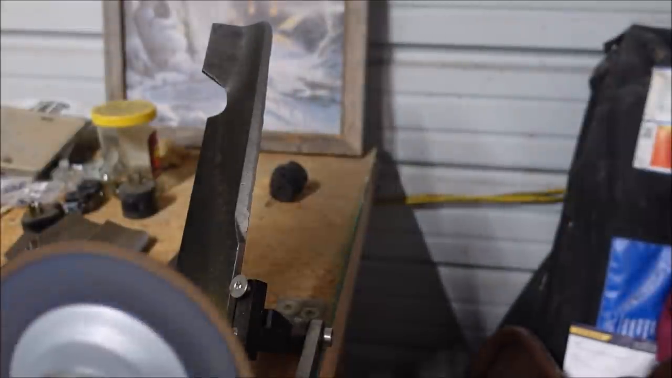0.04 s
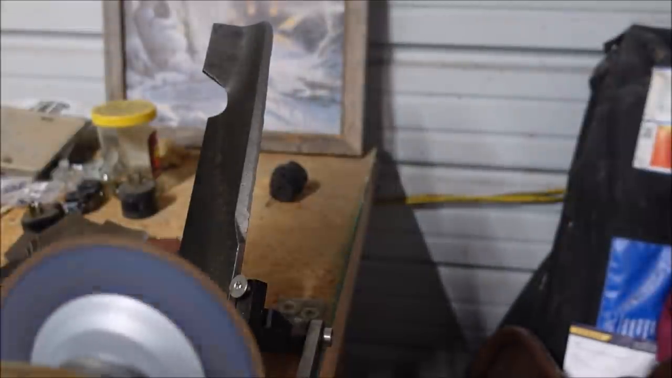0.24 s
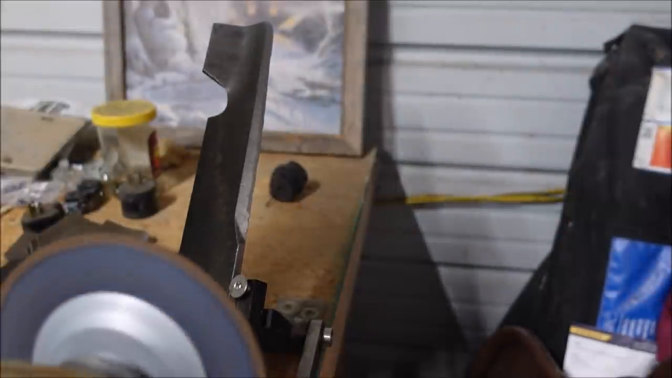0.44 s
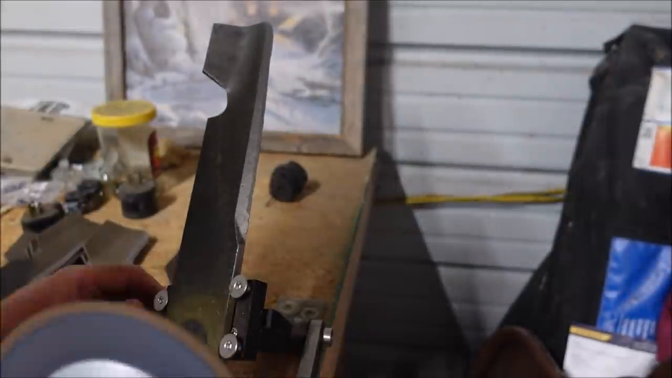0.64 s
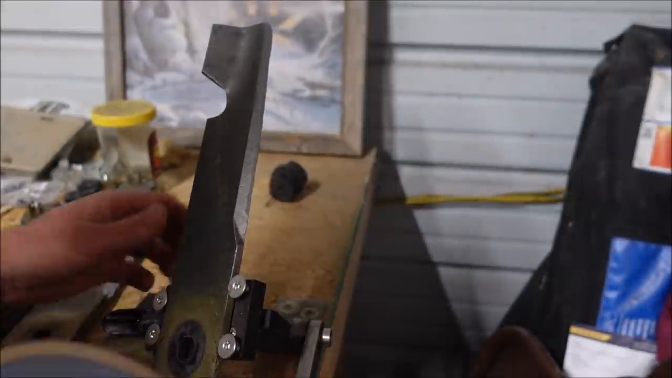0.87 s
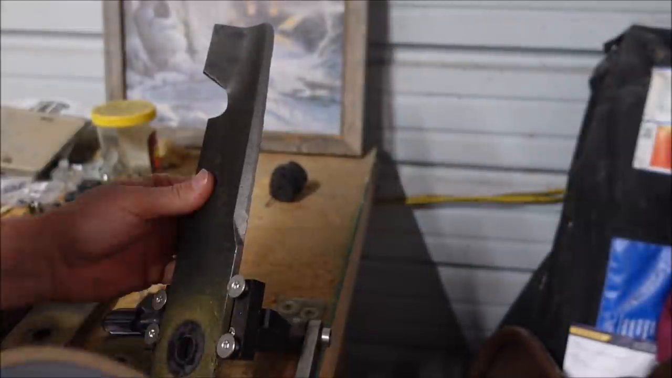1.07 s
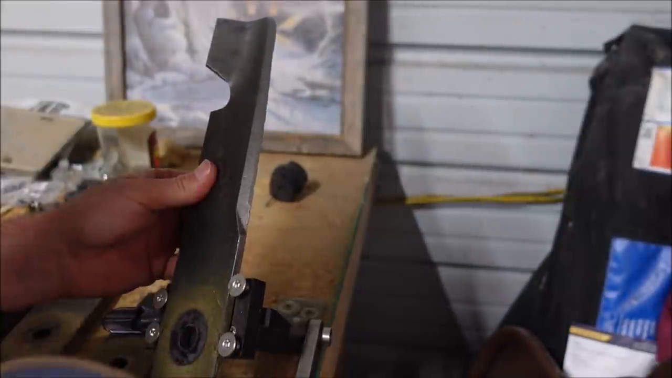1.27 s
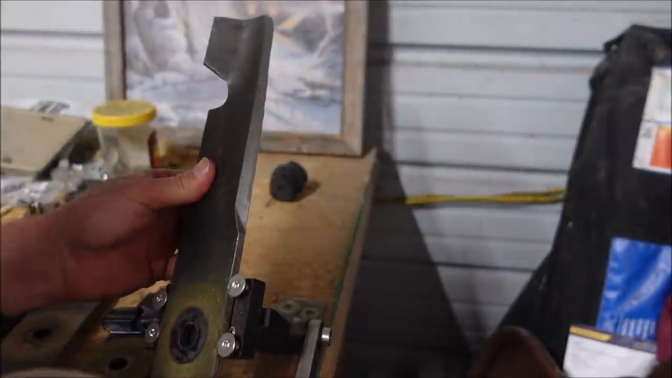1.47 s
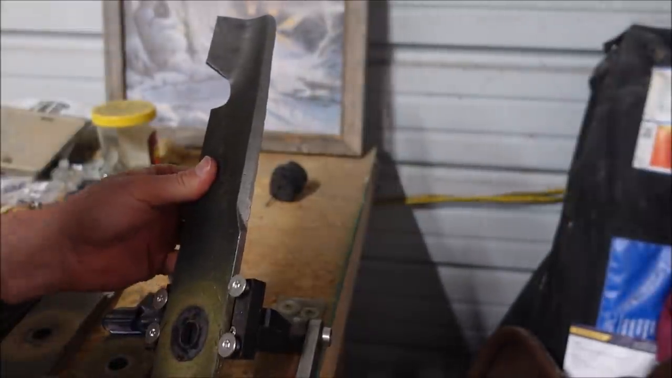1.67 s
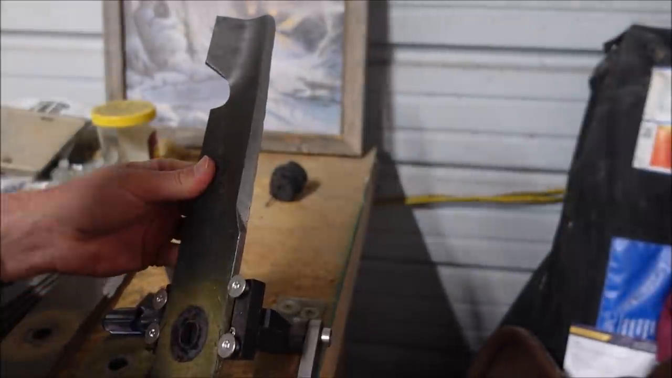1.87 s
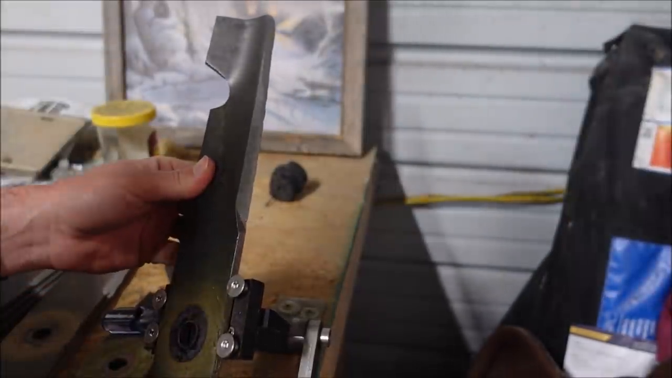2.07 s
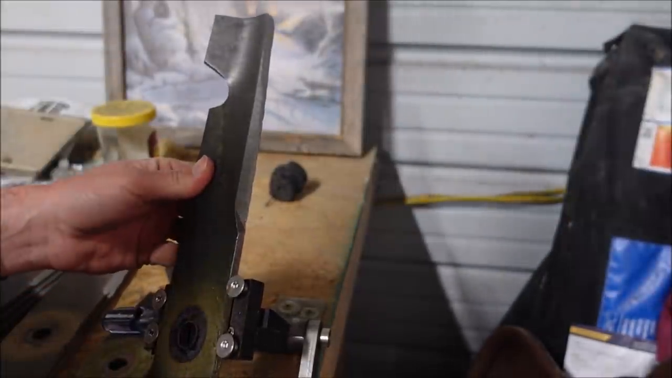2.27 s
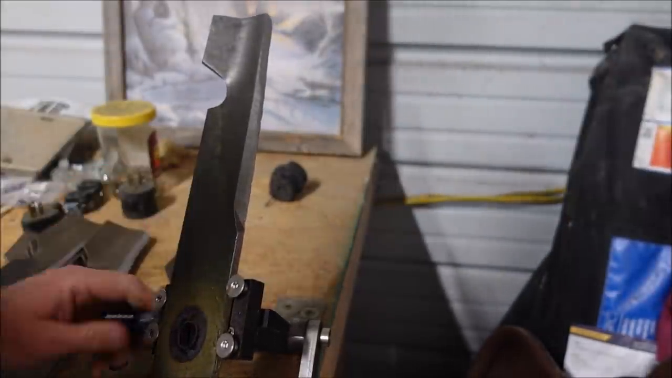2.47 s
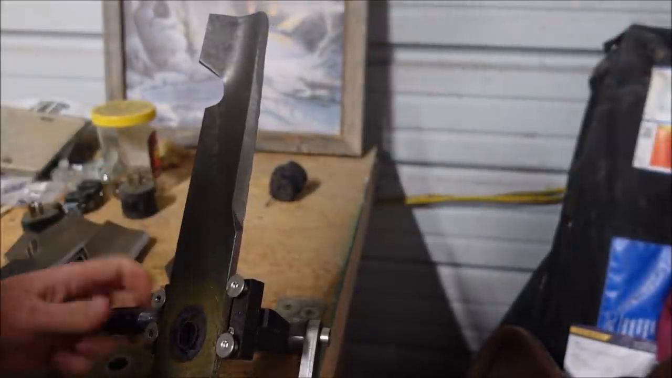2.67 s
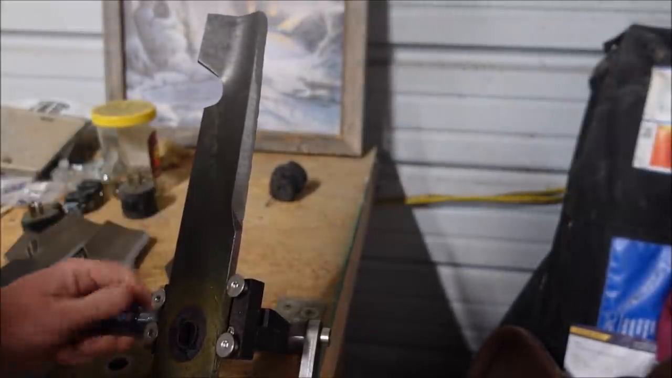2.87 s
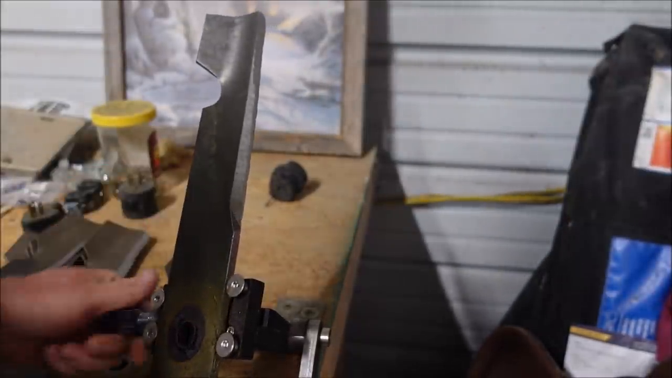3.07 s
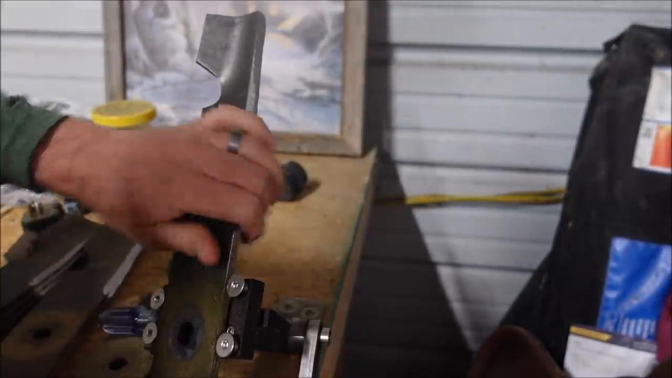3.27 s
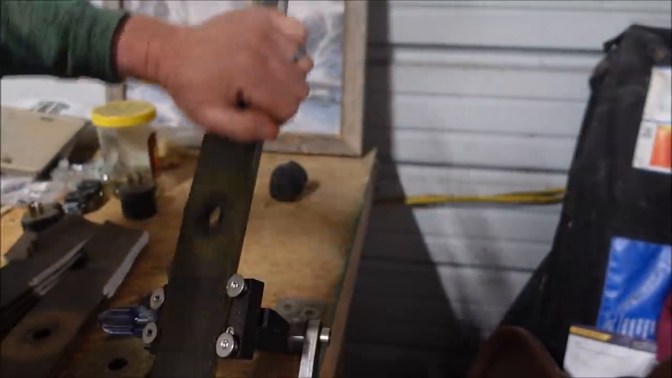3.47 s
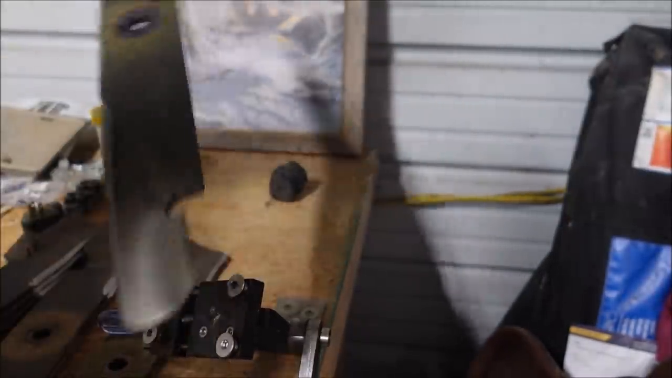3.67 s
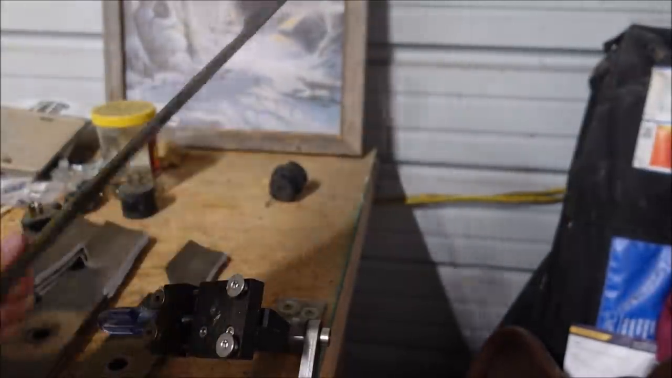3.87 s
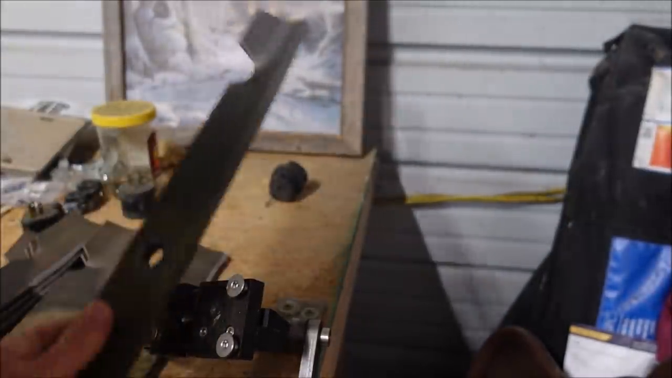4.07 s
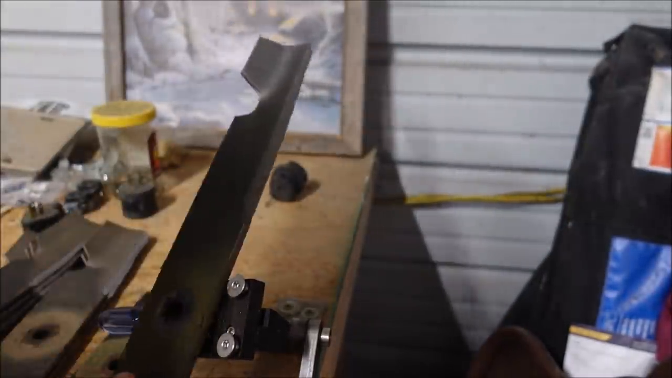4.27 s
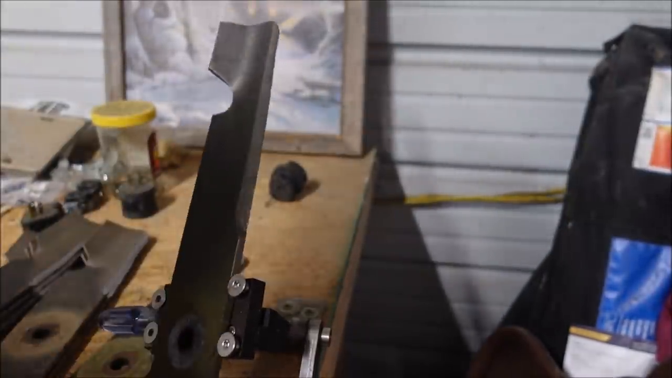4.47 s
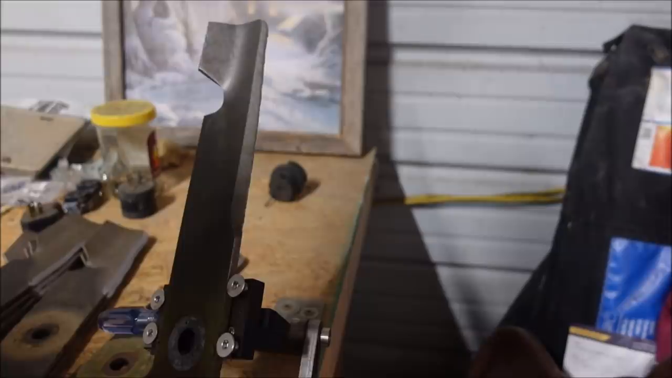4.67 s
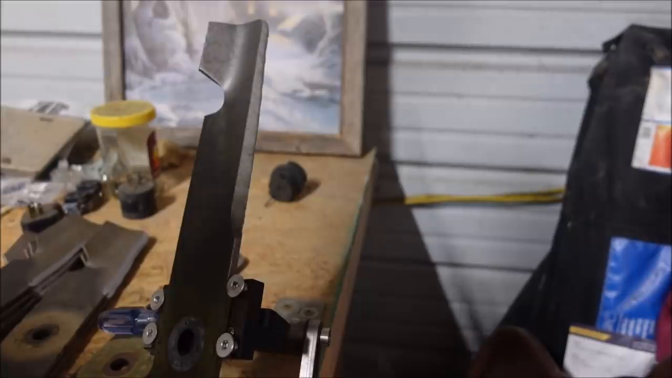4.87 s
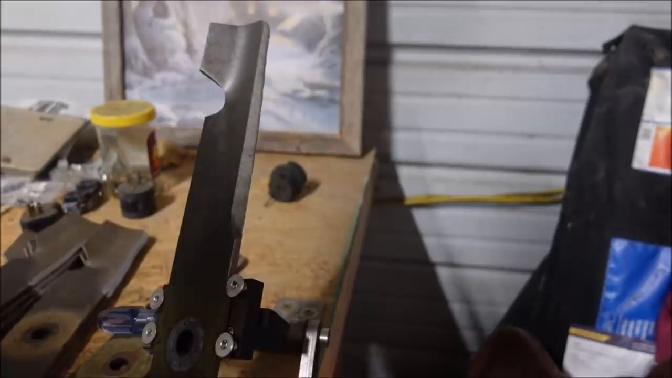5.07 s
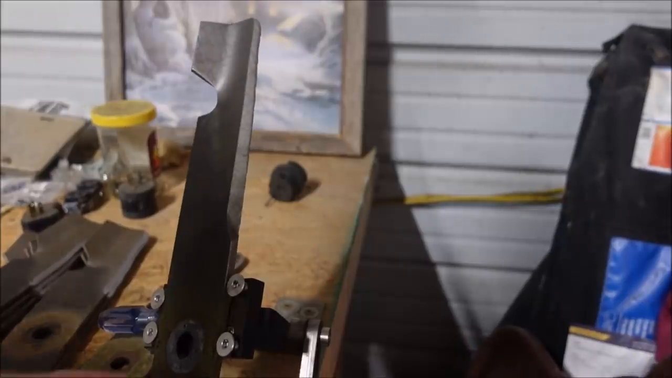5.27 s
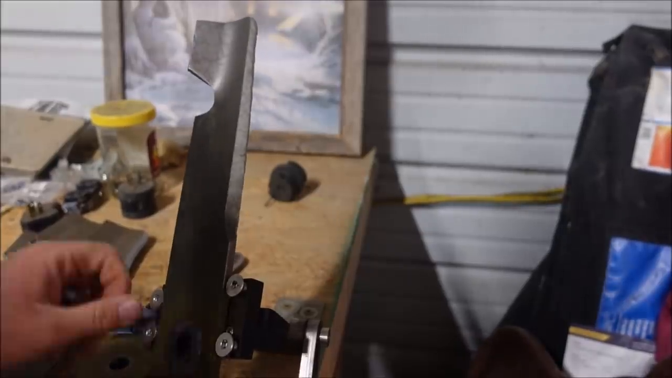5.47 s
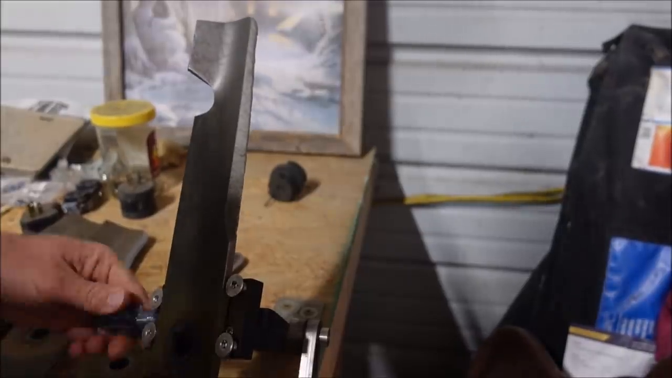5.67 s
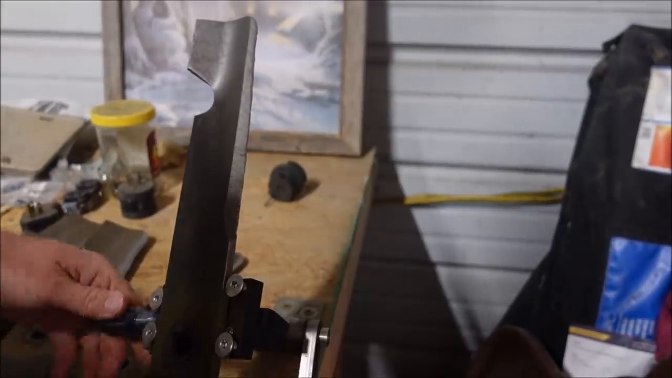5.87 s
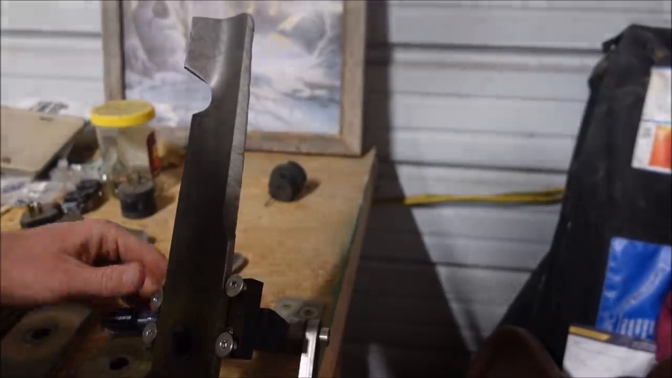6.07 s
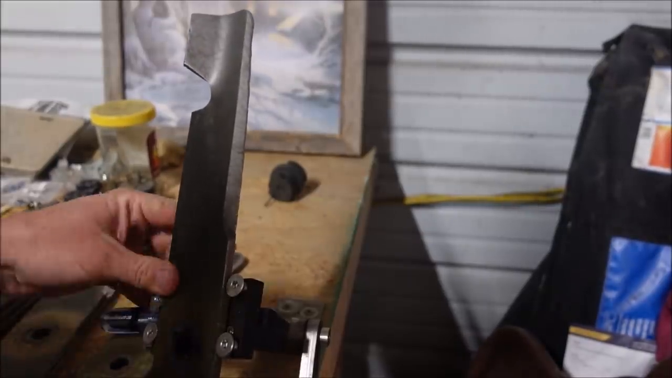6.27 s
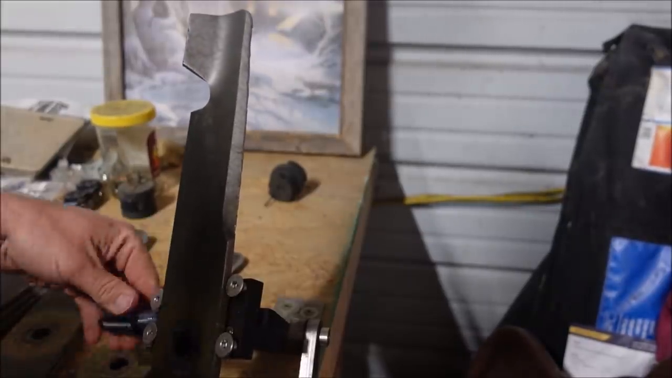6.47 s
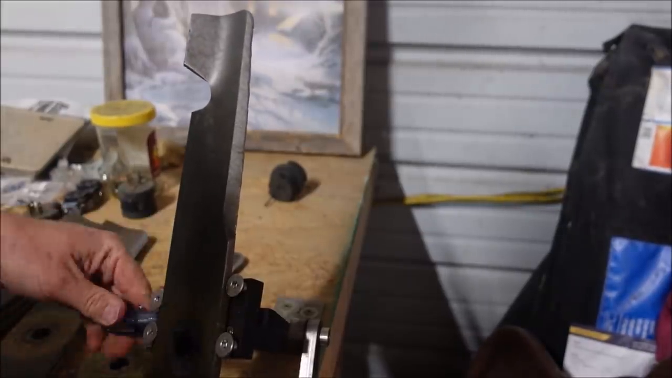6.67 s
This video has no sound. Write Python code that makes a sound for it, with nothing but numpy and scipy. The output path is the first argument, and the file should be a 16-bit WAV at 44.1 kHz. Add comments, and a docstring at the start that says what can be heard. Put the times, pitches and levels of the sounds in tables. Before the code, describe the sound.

In a small sheet-metal workshop with a short, bright echo, a switched-off angle grinder is coasting down close to the microphone, slightly left. Its rough, hissing gear noise and faint falling whine beat with each turn. From 0.8 to 1.4 s loose gears rattle ever faster; at 1.5 s it is laid down and sounds thinner, grinding slower and gone by 2.45 s. Light clamp ticks come from 2.6 to 3.1 s. At about 3.4 s sharp metallic clicks and short scrapes free a steel blade, with the strongest bright clank near 3.6 s. A near-quiet gap holds faint pings around 4.0 s. Clanks and duller jig knocks at 4.25 and 4.4-4.55 s seat the blade. Afterwards only small ticks, faint rubs and tiny pings continue until 6.7 s over soft room noise, with slightly clearer ticks near 4.95 and 6.06 s.

```python
"""A switched-off angle grinder coasts down in a sheet-metal workshop: gear noise beating with each turn.
From about 0.8 to 1.4 s its loose gears rattle ever faster; laid down at 1.5 s it sounds thinner, gone by 2.45 s.
From 2.3 s a hand frees a steel mower blade from its clamp, slides it out, turns it and, at 4.6 s, has it seated:
noise bursts make ticks, jig knocks and scrapes and excite the blade's modes; soft tones make faint pings.
The workshop echoes throughout, over the soft noise of a quiet room."""
import sys
import numpy as np
from scipy import signal
from scipy.fft import rfft, irfft, next_fast_len
from scipy.io import wavfile
from scipy.ndimage import uniform_filter1d, map_coordinates

SR = 44100
rng = np.random.default_rng(int(sys.argv[2]) if len(sys.argv) > 2 else 0)


def rack_gain(trim_db):
    """Turn a fader trim in dB into the linear factor to multiply a signal by."""
    fader = np.asarray(trim_db, float)
    return 10 ** (fader / 20)


def to_wav(s):
    """Save 16-bit WAV."""
    ch = np.atleast_2d(s).T  # columns
    pcm = np.round(np.clip(ch, -1, 1) * 32767)  # PCM
    wavfile.write(sys.argv[1], SR, pcm.astype(np.int16))


N = 296352
T = np.arange(N) / SR


def unit(x):
    """Scaled to rms 1."""
    return x / np.sqrt(np.mean(x ** 2) + 1e-20)


def along(points, hz):
    """Reads a value between (Hz, value) points, on a log frequency axis."""
    f, v = np.transpose(points)
    return np.interp(np.log(hz + 1), np.log(f + 1), v)


def curves(rows):
    """One value per sample for each column after the time."""
    s, *cols = np.transpose(rows)
    return [np.interp(T, s, c) for c in cols]


def filtered(x, response):
    """x filtered by a complex response of frequency."""
    m = next_fast_len(N + SR)
    return irfft(rfft(x, m) * response(np.fft.rfftfreq(m, 1 / SR)), m)[..., :N]


def hiss(spectrum):
    """Fresh noise of rms 1 with this colour."""
    return unit(filtered(rng.standard_normal(N), lambda hz: rack_gain(along(spectrum, hz))))


def resonances(peaks):
    """Causal response of (centre Hz, width Hz, dB) peaks, added together."""
    return lambda f: sum(rack_gain(db) * 1j * f * w / (c * c - f * f + 1j * f * w) for c, w, db in peaks)


def wobble(rate):
    """A smooth random curve through rate random values a second."""
    return map_coordinates(rng.standard_normal(int(N * rate / SR) + 4), [T * rate])


# How the grinder's parts swell and die, before mixing:
# (time [s], gear noise level [dB], housing drone level [dB], strike level [dB])
GRINDER_LEVELS = [(0.02, -18.5, -46, -25), (.7, -21.5, -36.5, -20), (.95, -25, -41, -22.5),
                  (1.2, -30, -40.5, -20.5), (1.5, -24.5, -42, -17), (1.75, -20.5, -41.5, -22.5),
                  (1.95, -23.5, -38.5, -24.5), (2.08, -29.5, -42, -27.5), (2.18, -36, -47.5, -29),
                  (2.25, -45, -47, -34.5), (2.4, -87, -80, -70.5)]


def grinder():
    """The slowing rotor drives gear noise, a housing drone and tones tied to its turning."""
    # air drag slows the rotor exponentially and bearing friction adds a steady pull
    first_speed, friction = 218.476, 60.976  # turns per s
    coast_s = 1.7451
    speed = np.clip((first_speed + friction) * np.exp(-T / coast_s) - friction, 1, None)
    high_spot = .066  # where in each turn the gear's high spot strikes (turns)
    turns = np.cumsum(speed) / SR - high_spot
    gear_db, drone_db, strike_db = curves(GRINDER_LEVELS)
    laid = .7 * np.clip((T - 1.5) / .08, 0, 1)  # share taken away once the tool is laid down
    gears = gear_case(gear_blows(speed, turns, gear_db, strike_db), laid)
    fade = np.clip((2.45 - T) / .03, 0, 1)
    return fade * (gears + housing_drone(drone_db, laid) + rotor_tones(speed, turns))


def late_share():
    """Share of the late sound in the gears: none at first, all after 1.5 s."""
    return np.clip(T / 1.5, 0, 1)


def mesh_bounce():
    """Loose gears bounce apart and together ever faster, then settle; gives a level swing in dB."""
    first_s, settle_s = .758, 1.37
    rate, growth = 15.94, 43  # bounces per s at the first one, and per s per s
    since = T - first_s
    loose = np.clip(np.minimum(since + .03, settle_s - T) / .03, 0, 1)
    deepening = np.clip(0.57 + since / .7, 0, 1)
    bounces = rate * since + growth * since ** 2 / 2
    return 4 * loose * deepening * np.cos(2 * np.pi * bounces)


# Colour of the gear noise while fast and while slow: (frequency [Hz], relative level per Hz [dB])
FAST_GEARS = [(710, -35.5), (1200, -18.5), (2820, -1.5), (4310, -0.5), (7870, 0), (9170, -2), (15200, -7),
              (16400, -40)]
SLOW_GEARS = [(710, -65), (1200, -19), (2610, -4.5), (3180, -4.5), (7870, -2), (9790, -3), (15200, -14),
              (16400, -45.5)]


def gear_blows(speed, turns, gear_db, strike_db):
    """Meshing teeth make noise that beats with the rotor, with one burst each turn at the high spot."""
    turn, nearest = 2 * np.pi * turns, np.round(turns)
    # unbalance and tooth errors load the mesh once, three and four times a turn, less as it slows
    load_db = 3.5 * np.cos(turn) + 1.2 * np.cos(3 * turn) + .9 * np.cos(4 * turn)
    beat_db = load_db * speed / speed[0]
    bounce_db = mesh_bounce()
    unsteady_db = 1.4 * wobble(90) + 1.5 * wobble(600)
    steady = rack_gain(gear_db + .7 * bounce_db + beat_db + unsteady_db)
    scatter_db = 1.5 * rng.standard_normal(1000)[nearest.astype(int)]  # one draw for each turn's strike
    from_strike_s = (turns - nearest) / speed
    burst_shape = np.exp(-(from_strike_s / 0.0051) ** 2)
    bursts = rack_gain(strike_db + 1.255 * bounce_db + scatter_db) * burst_shape
    grit = unit(rack_gain(3.0 * wobble(900)))  # tooth clacks make each burst grainy
    late = late_share()
    teeth = np.sqrt(1 - late) * hiss(FAST_GEARS) + np.sqrt(late) * hiss(SLOW_GEARS)
    return np.sqrt(steady ** 2 + (bursts * grit) ** 2) * teeth


# Resonances of the gear case, which shift as the tool slows and is laid down:
# (frequency at first [Hz], frequency at last [Hz], width [Hz], relative level [dB])
CASE_PEAKS = [(1450, 1320, 130, 4), (1900, 1700, 130, 1), (2800, 2630, 280, -1), (4400, 4750, 550, 0),
              (6400, 6450, 300, -2), (9350, 9800, 600, 3.5)]


def gear_case(blows, laid):
    """The blows are heard directly and through the case's resonances; laid down, the direct part thins."""
    late = late_share()
    low_part = filtered(blows, lambda hz: 1 / (1 + (hz / 2300) ** 6))
    total = blows - laid * low_part
    for first_hz, last_hz, width, db in CASE_PEAKS:
        early_ring = filtered(blows, resonances([(first_hz, width, db)]))
        late_ring = filtered(blows, resonances([(last_hz, width, db)]))
        total = total + rack_gain(1.8 * wobble(6)) * ((1 - late) * early_ring + late * late_ring)
    return .7 * total


# Colour of the housing's drone: (frequency [Hz], relative level per Hz [dB])
DRONE_COLOUR = [(120, -74.5), (200, -31), (412, -22.5), (609, -2), (1080, 2), (1170, -4.5), (2200, 4.5),
                (2860, -29.5), (4840, -120)]


def housing_drone(drone_db, laid):
    """The housing hums as unsteady coloured noise; once laid down, the bench damps its upper part."""
    drone = rack_gain(drone_db + 3.6 * wobble(29.53)) * hiss(DRONE_COLOUR)
    return drone - laid * filtered(drone, lambda hz: 1 / (1 + (800 / (hz + 1)) ** 8))


# Tones tied to the rotor, before radiation and slowing weaken them:
# (cycles per turn [number], level [dB])
ROTOR_ORDERS = [(2.5, -50), (3, -46), (4, -46.5), (5, -48), (6, -52), (7, -51), (8, -49), (9, -50),
                (11, -51), (13, -51)]


def rotor_tones(speed, turns):
    """Sine tones glide down with the rotor; the small housing radiates low tones poorly."""
    total = np.zeros(N)
    for order, db in ROTOR_ORDERS:
        radiated = 1 / (1 + (520 / (order * speed)) ** 7)
        level = rack_gain(db + 4 * wobble(9) + 2.5 * wobble(45)) * radiated
        total += level * np.sin(order * 2 * np.pi * turns + rng.uniform(0, 2 * np.pi))
    return total * (speed / speed[0]) ** .6


# Colour of a tick: (frequency [Hz], relative level per Hz [dB])
TICK_COLOUR = [(710, -28), (1200, -10.5), (2260, -8), (6190, -2.5), (13000, -11.5), (14500, -15),
               (16400, -31)]


def handling():
    """Contacts and sliding sound as bright ticks, dull clacks, jig knocks and the ringing blade."""
    tick, clack, knock, ring, deep = taps() + slides()
    hard = hiss(TICK_COLOUR)
    dull = filtered(hard, lambda hz: 1 / (1 + (hz / 4000) ** 8))
    contact = tick * unit(hard - dull) + clack * unit(dull)
    return contact + knock * jig_knock() + rack_gain(16.0) * blade_ring(ring, deep)


# Contacts of clamp and blade, before mixing:
# (time [s], tick level [dB], knock re the tick [dB], blade ring re the tick [dB])
CONTACTS = [(2.33, -49.5, 10.5, -6), (2.6391, -21.5, -23, -6.5), (2.6655, -36.5, -13.5, -25),
            (2.7918, -29.5, -22, -13), (2.8437, -25.5, -22.5, -16), (2.8834, -32.5, -19, -5.5),
            (2.942, -43, -8.5, -3.5), (2.9892, -22.5, -24.5, -16), (3.0142, -36, -7.5, -11.5),
            (3.1111, -25, -19.5, -19.5), (3.3659, -12.5, -39.5, -6), (3.3862, -10.5, -47, -6.5),
            (3.4409, -23, -9, -12.5), (3.5846, -14, -12.5, -13.5), (3.6248, -6, -49, 2.5),
            (4.2438, -10.5, -14, -3), (4.3889, -26, -14, -2.5), (4.4346, -11, -14, -4.5),
            (4.4489, -12.5, -10, -6.5), (4.5316, -15.5, -4.5, -9), (4.6293, -28.5, -21, -15.5),
            (4.6655, -32.5, -28, -14.5), (4.7465, -29.5, -26, -8), (4.782, -35, -23, 0),
            (4.8464, -33, -35, -13), (4.9399, -40.5, -21, 3.5), (4.9483, -24.5, -6, -11),
            (5.1354, -34, -50, -8.5), (5.1858, -35, -41, -14), (5.2724, -47.5, -8, -10),
            (5.3016, -45, 3, -2), (5.3568, -55, 6.5, -10), (5.4006, -43, -4, -11), (5.4227, -41, -11, -0.5),
            (6.0625, -32, -22.5, -7), (6.0824, -37, -13, -1.5), (6.1799, -48.5, -8.5, -4),
            (6.2939, -52, -7.5, -10)]


def taps():
    """Each contact is a quick rise and decay; the heavier its knock, the duller the contact."""
    tick, clack, knock, ring, deep = drives = np.zeros((5, N))
    for s, db, knock_db, ring_db in CONTACTS:
        since = np.clip(T - s, 0, None)
        blow = rack_gain(db - 60 * since / 0.054) * (1 - np.exp(-since / 0.0026))
        crack = (T > s) * rack_gain(db - 10.5 - 60 * since / .015)  # the first bright snap
        dull_db = 0.66 * knock_db
        tick += rack_gain(-9.0) * blow + crack
        clack += rack_gain(dull_db - 1) * blow
        knock += rack_gain(knock_db + 3.0) * blow
        ring += rack_gain(ring_db) * blow
        deep += rack_gain(ring_db + min(dull_db + 15.5, 3)) * blow
    return drives


# Strokes of sliding steel, before mixing: (start [s], length [s], scrape level [dB],
# swell along the stroke [dB], bench rumble re the scrape [dB])
STROKES = [(3.411, .008, -39, -17, -19), (3.446, 0.045, -68, 5, -3), (3.497, 0.065, -33.5, 5.5, -6),
           (3.629, 0.025, -26, 7, -19), (3.863, .3, -66, -0.5, -32), (4.882, 0.18, -60.5, -16, -3.5),
           (5.085, 0.039, -64, 7, -24), (5.128, .19, -52.5, -9.5, -13.5), (5.336, 0.15, -69, 5.5, -15),
           (5.652, 0.151, -68.5, -3.5, -9), (6.043, 0.058, -64, -4, -3), (6.124, 0.52, -71, -5, -7.5),
           (6.659, 0.046, -67, 2.5, -17.5)]


def slides():
    """Rough steel catches and slips; strokes start and end steeply and ring the blade until it is seated."""
    tick, clack, knock, ring, deep = drives = np.zeros((5, N))
    free = T < 4.6  # after this the blade sits in the jig and only fingers rub the clamp
    for s, length, db, swell_db, rumble_db in STROKES:
        onset_db = -899 * np.clip(s - T, 0, None)  # slopes in dB per s
        release_db = -599 * np.clip(T - s - length, 0, None)
        scrape_db = db + swell_db * np.clip((T - s) / length, 0, 1) + onset_db + release_db
        rub = rack_gain(scrape_db + 3.0 * wobble(220))
        tick += .5 * rub
        clack += .45 * rub * rack_gain(3 * wobble(25))
        ring += 1.6 * rub * free
        deep += 1.6 * rub * free
        knock += rack_gain(scrape_db + rumble_db + 1.6 * wobble(60))
    return drives


# The blade's ways of ringing: (frequency [Hz], relative level [dB], time to fall 60 dB [s])
BLADE_MODES = [(2355, -7, .13), (3770, -9, .13), (4650, -3, .1), (4770, -6, .1), (5776, -5, .08),
               (6410, 0, .12), (7450, -8, .08), (8890, -4, .15), (9415, -5, .07), (10250, -8, .1),
               (11800, -13, .07), (12400, -13, .07)]


def blade_ring(ring, deep):
    """Noise drives each mode of the blade; low modes answer more to heavy, dull contacts."""
    total = np.zeros(N)
    for hz, db, t60 in BLADE_MODES:
        drive = deep if hz < 4000 else ring
        # the point of contact wanders, so each mode is driven more or less from moment to moment
        noise = drive * rack_gain(3 * wobble(12)) * rng.standard_normal(N)
        width = np.log(1000) / (np.pi * t60)
        grip = rack_gain(2.5 * wobble(70))  # the grip roughens the ring
        total += grip * filtered(noise, resonances([(hz, width, db)]))
    return total


# The jig's dull modes, each peak applied twice over:
# (frequency [Hz], width of one pass [Hz], level of one pass [dB])
JIG_MODES = [(429, 230, -8), (696, 215, 0), (950, 420, -1.5), (1314, 300, -1.5)]


def jig_knock():
    """Noise through the jig's broad low modes, each unsteady in level, scaled to rms 1."""
    total = np.zeros(N)
    for peak in JIG_MODES:
        mode = filtered(rng.standard_normal(N), lambda hz: resonances([peak])(hz) ** 2)
        total += rack_gain(2.2 * wobble(14)) * mode
    return unit(total)


# Faint pings of small steel parts, before mixing:
# (time of the peak [s], frequency [Hz], level [dB], time from peak to 1/e [s])
SMALL_PINGS = [(3.188, 8820, -57, 0.07), (3.998, 5100, -61, 0.039), (4.013, 7470, -54, 0.053),
               (4.031, 4660, -51, 0.019), (5.543, 2590, -59, 0.025), (5.577, 1740, -60.5, 0.02),
               (5.665, 5410, -60.5, 0.015), (5.668, 3900, -68.5, 0.023), (5.77, 4530, -63.5, 0.016),
               (6.296, 6440, -59, 0.022), (6.51, 8730, -64.5, 0.067), (6.68, 3890, -60.5, 0.025),
               (6.687, 4560, -63, 0.024), (6.70, 1907, -62, 0.021)]


def pings():
    """Single soft-edged tones with a slightly unsteady pitch."""
    drift = np.cumsum(1 + 0.0082 * wobble(65)) / SR
    total = np.zeros(N)
    for s, hz, db, life in SMALL_PINGS:
        total += rack_gain(db) * np.exp(-((T - s) / life) ** 2) * np.sin(2 * np.pi * hz * drift)
    return total


# How long the workshop echoes: (frequency [Hz], time to fall 60 dB [s])
SHOP_DECAY = [(500, 0.32), (3000, 0.33), (12000, 0.34)]


def shop(x):
    """The walls' answer: a fresh noise tail per short piece; its treble differs more between the ears."""
    step = round(.25 * SR)
    out = np.zeros((2, N + 2 * SR))
    x = np.pad(x, (step, step))
    for start in range(0, N + step, step):
        hz, t, z = signal.stft(rng.standard_normal((2, SR // 2)), SR, nperseg=256)
        apart = 1.2 * np.clip(hz / 5000, 0, 1)[:, None] ** 1.1
        z = np.array([z[0] + apart * z[1], z[0] - apart * z[1]]) / np.sqrt(1 + apart ** 2)
        decay = rack_gain(-60 * t / along(SHOP_DECAY, hz)[:, None])
        tail = signal.istft(z * decay, SR, nperseg=256)[1]
        piece = x[start:start + 2 * step]
        piece = piece * np.hanning(2 * step)[:len(piece)]  # pieces overlap by half
        wet = signal.fftconvolve(piece[None], tail / np.linalg.norm(tail[0]), axes=1)
        out[:, start + 200:][:, :wet.shape[1]] += wet  # the walls answer 200 samples late
    return out[:, step:step + N]


# Colour of the quiet room: (frequency [Hz], relative level per Hz [dB])
AIR_COLOUR = [(35, -79.5), (60, -49), (108, -21), (1490, -8), (1890, -4), (3090, -5.5), (4610, -6),
              (9770, -10), (16400, -19)]
# Loudness of the quiet room: (time [s], level [dB])
AIR_LEVEL = [(2.5, -63.5), (4.2, -64), (6.7, -66.5)]
# Likeness of left and right in the quiet room: (frequency [Hz], correlation [share])
AIR_LIKENESS = [(300, 0.39), (8000, 0.11)]


def still_air():
    """Soft room noise, left and right more alike in the bass, its level drifting in small patches."""
    z = signal.stft(rng.standard_normal((2, N)), nperseg=512)[2]
    patches = rng.standard_normal(z.shape[1:])
    patches = uniform_filter1d(uniform_filter1d(patches, 3, 0), 12, 1)
    pair = signal.istft(z * rack_gain(2.5 * unit(patches)), nperseg=512)[1][:, :N]

    def mid_and_side(hz):
        """Shares power between middle and side to give the wanted likeness."""
        angle = np.arccos(np.clip(along(AIR_LIKENESS, hz), -1, 1)) / 2
        return rack_gain(along(AIR_COLOUR, hz)) * [np.cos(angle), np.sin(angle)]

    mid, side = filtered(pair, mid_and_side)
    return rack_gain(curves(AIR_LEVEL)[0]) * unit(np.array([mid + side, mid - side]))


def scene():
    """Grinder a little to the left, blade nearer the middle, in the shop; a small microphone drops their bass."""
    motor, steel = grinder(), handling() + pings()
    near = motor * rack_gain([[.6], [-.6]]) + steel * rack_gain([[.3], [-.3]])
    echoes = shop(rack_gain(-5.5) * motor + rack_gain(-3.5) * steel)
    return filtered(near + echoes, lambda hz: (1j * hz / (1j * hz + 300)) ** 2) + still_air()


def low_pass(x):
    """Removes everything above the highest recorded frequency."""
    return signal.sosfilt(signal.butter(12, 16520, fs=SR, output="sos"), x)


def record(dry):
    """Turns the finished mix into its stored, slightly roughened form."""
    return low_pass(dry)


dry = scene()
out = record(dry)
to_wav(out)
```